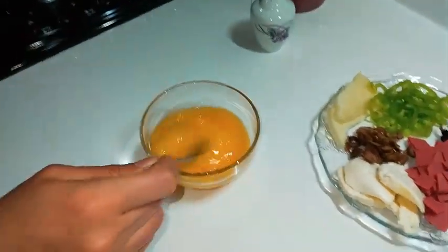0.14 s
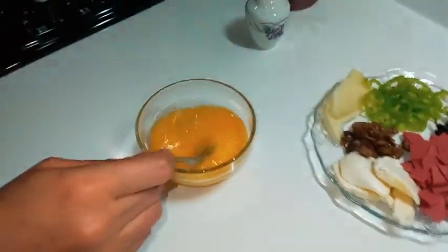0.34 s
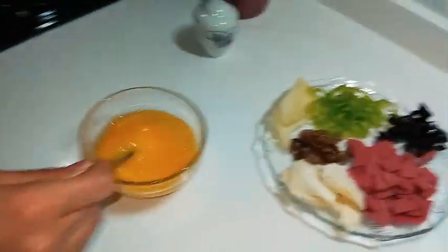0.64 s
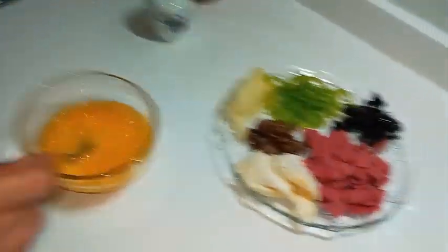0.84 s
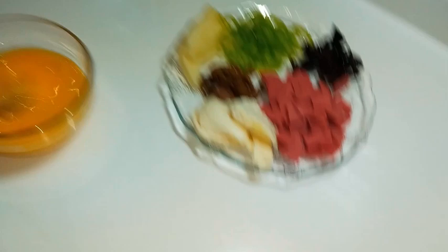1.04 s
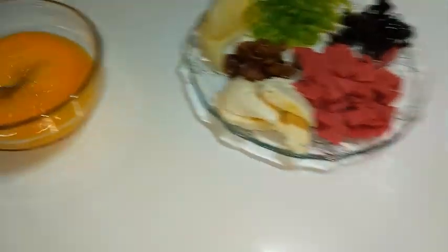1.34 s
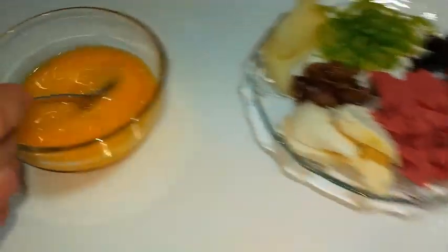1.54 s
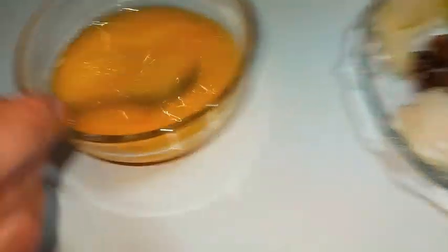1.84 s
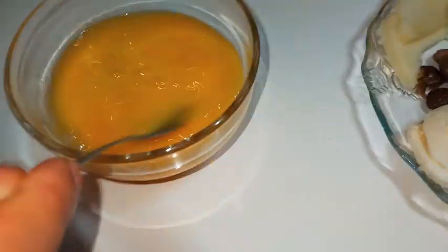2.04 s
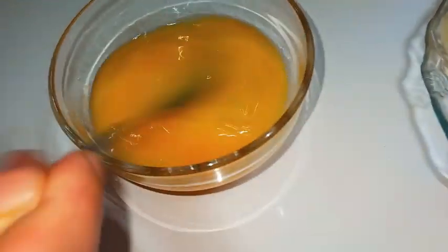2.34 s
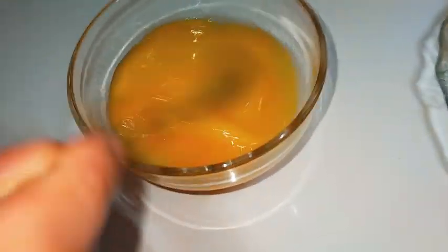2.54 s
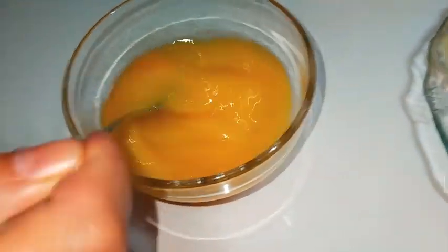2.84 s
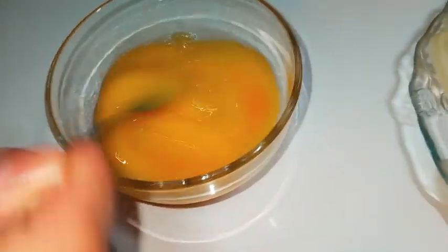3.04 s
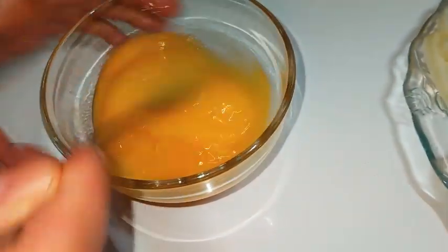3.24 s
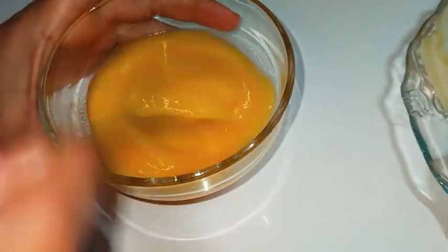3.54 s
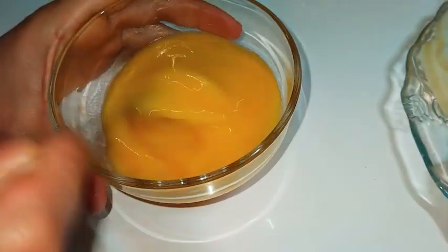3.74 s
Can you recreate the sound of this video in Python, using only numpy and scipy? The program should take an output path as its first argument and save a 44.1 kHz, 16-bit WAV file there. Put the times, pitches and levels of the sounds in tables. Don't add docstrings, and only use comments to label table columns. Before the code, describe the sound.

Spoon clinks on an egg-filled glass bowl, uneven at first, then in quick steady strokes

```python
import sys
import numpy as np
from scipy import signal
from scipy.fft import rfft, irfft, next_fast_len
from scipy.io import wavfile
from scipy.ndimage import map_coordinates

SR = 44100
rng = np.random.default_rng(int(sys.argv[2]) if len(sys.argv) > 2 else 0)


def linear_from_db(decibels):
    return 10 ** (np.asarray(decibels, float) / 20)


def unload_wav(signal):
    wavfile.write(
        sys.argv[1],
        SR,
        np.round(np.clip(np.atleast_2d(signal).T, -1, 1) * 32767).astype(np.int16),
    )


N = 171990

# (pitch [Hz], level [dB], time to fall 60 dB [s])
DAMPED_GLASS = [(2900, -12, .008), (3650, -7, .005), (4500, -12, .005), (5600, -15, .005), (6400, -4, .007),
                (7850, -7, .007), (8600, -6, .008), (9500, -10, .005), (10200, -8, .009), (12000, -4, .007),
                (13800, 7, .0016), (13350, -2, .006), (14600, -2, .005), (15500, 0, .006)]
# (pitch [Hz], level [dB], time to fall 60 dB [s])
COUNTER_NOTES = [(305, 6, 0.043), (498, 0.5, 0.11), (595.5, 8.5, 0.04), (682.5, 10, 0.036),
                 (948, -2.5, 0.082), (1033, 15.5, 0.02), (1326, 1.5, 0.018), (1451, 12, 0.019),
                 (1659, -5, 0.073), (1806, 24.5, 0.0062), (2328, 2, 0.04)]
DETUNE = .015


def unit(x):
    return x / np.sqrt(np.mean(x ** 2) + 1e-20)


def along(points, hz):
    f, v = np.transpose(points)
    return np.interp(np.log(hz + 1), np.log(f + 1), v)


def wobble(rate):
    knots = rng.standard_normal(int(N / SR * 40) + 9)
    return map_coordinates(knots, [np.arange(N) * min(rate, 39) / SR])


def shaped_noise(points):
    m = next_fast_len(N + 8192)
    spectrum = rfft(rng.standard_normal(N), m)
    return unit(irfft(spectrum * linear_from_db(along(points, np.fft.rfftfreq(m, 1 / SR))), m)[:N])


def ring(modes, attack_s, detune, size):
    scatter_db = 2.5
    hz, db, t60 = np.transpose(modes)[:, :, None]
    t = np.arange(size) / SR
    level_luck, pitch_luck = rng.standard_normal((2, len(modes), 1))
    start_db = db + scatter_db * level_luck
    waves = linear_from_db(start_db - 60 * t / t60) * np.sin(2 * np.pi * hz * (1 + detune * pitch_luck) * t)
    return waves.sum(0) * (1 - np.exp(-t / attack_s)) / np.linalg.norm(linear_from_db(start_db))


def struck(modes, chatter_s, attack_s):
    chatter_db = -24
    t = np.arange(SR // 16) / SR
    force = linear_from_db(chatter_db - 60 * t / chatter_s) * rng.standard_normal(len(t))
    force[0] = 1
    x = signal.fftconvolve(ring(modes, attack_s, DETUNE, size=SR // 8), force)
    return x / np.abs(x).max()


def kitchen(x):
    # (pitch [Hz], time to fall 60 dB [s])
    echo_decay = [(250, .45), (1000, .45), (4000, .3), (9000, .25), (16000, .22)]
    room_db, delay_s, tilt_db = -12.5, 0.0043, -2.5
    hz, t, z = signal.stft(rng.standard_normal(SR // 3), SR, nperseg=256)
    hz = hz[:, None]
    fade_db = -60 * t / along(echo_decay, hz) + tilt_db * np.log2(1 + hz / 1000)
    tail = signal.istft(z * linear_from_db(fade_db), SR, nperseg=256)[1]
    tail = np.pad(tail, (round(delay_s * SR), 0))
    wet = linear_from_db(room_db) * signal.fftconvolve(x, tail / np.linalg.norm(tail[:SR // 10]))
    return wet + np.pad(x, (0, len(wet) - len(x)))


def add(track, s, sound, room=1):
    part = track[round((s + 1) * SR):]
    wet = room * kitchen(sound)
    wet[:len(sound)] += (1 - room) * sound
    part[:len(wet)] += wet[:len(part)]


def air():
    # (pitch [Hz], level per Hz [dB])
    rumble_curve = [(15, -21.5), (30, -13.5), (100, 5.5), (180, -11), (320, -8.5), (800, -14), (2500, -21),
                    (4000, -58.5)]
    # (pitch [Hz], level per Hz [dB])
    hiss_curve = [(1500, -20), (2800, 3), (4500, -1), (6300, 0), (7200, -6), (8500, -1), (11000, -3),
                  (14000, 0)]
    # (pitch [Hz], level [dB])
    hum_notes = [(49, -62.5), (98, -64.5), (288, -77.5), (1310, -75), (552, -72)]
    t = np.arange(N) / SR
    sound = shaped_noise(rumble_curve) * linear_from_db(-60 + .8 * wobble(3.4))
    sound += shaped_noise(hiss_curve) * linear_from_db(-70.5)
    for hz, db in hum_notes:
        sound += linear_from_db(db + 2.5 * wobble(5)) * np.sin(2 * np.pi * hz * t + .6 * wobble(4))
    return sound


def handling():
    # (time [s], level [dB], pitch [Hz])
    pushes = [
        (0.444, -39, 30.7),
        (3.033, -40.5, 59.4),
    ]
    push_s = 0.012
    t = np.arange(N) / SR
    sound = np.zeros(N)
    for s, db, hz in pushes:
        sound += linear_from_db(db) * np.exp(-((t - s) / push_s) ** 2) * np.sin(2 * np.pi * hz * (t - s))
    return sound


def egg():
    # (time [s], bubble level [dB])
    stirring = [(0, -78), (.7, -81), (1, -70.5), (1.8, -84), (2.1, -64), (3.5, -57.5), (3.62, -49),
                (3.9, -49)]
    bubbles_per_s, middle_hz, ring_cycles, spread_db = 70, 2400, 6, 3
    count, t = bubbles_per_s * N // SR, np.arange(SR // 50) / SR
    s = rng.random(count) * N / SR
    hz = middle_hz * np.exp(.45 * rng.standard_normal((count, 1)))
    db = np.interp(s, *np.transpose(stirring)) + spread_db * rng.exponential(size=count)
    cycles = hz * t
    shape = linear_from_db(-60 * cycles / (3 * ring_cycles)) * (1 - np.exp(-cycles))
    rising = np.sin(2 * np.pi * cycles * (1 + cycles / 100))
    bubbles = linear_from_db(db)[:, None] * shape * rising
    where = (s * SR).astype(int)[:, None] + np.arange(len(t))
    return kitchen(np.bincount(where.ravel(), bubbles.ravel(), minlength=N))[:N]


def scraping():
    # (time [s], length [s], level [dB])
    drags = [(0.66, 0.056, -48), (1.145, 0.043, -57.5), (1.203, 0.027, -60), (1.432, 0.063, -60),
             (1.984, 0.033, -61), (2.534, 0.03, -41.5), (3.437, 0.027, -44.5), (3.81, 0.031, -51)]
    t = np.arange(N) / SR
    stroke = np.zeros(N)
    for s, length, db in drags:
        stroke += linear_from_db(db) * np.sin(np.pi * np.clip((t - s) / length, 0, 1)) ** 2
    grit = rng.standard_normal(N) * linear_from_db(3 * wobble(35))
    glass = ring(DAMPED_GLASS, 5e-5, DETUNE, size=SR // 20)
    return stroke * unit(signal.fftconvolve(grit, glass)[:N])


def sloshing():
    # (time [s], length [s], level [dB], boost of the low notes [dB])
    sloshes = [
        (3.588, 0.067, -35.5, 7),
        (3.602, 0.026, -29, -13),
        (3.665, 0.055, -59, 11),
        (3.721, 0.0173, -37, 13),
        (3.782, 0.045, -51, 13),
    ]
    # (pitch [Hz], level [dB], time to fall 60 dB [s])
    low_notes = [(497, -3.5, 0.034), (617.6, 1.5, 0.032), (753, -1.5, 0.061), (890, -3.5, 0.06)]
    high_notes = [(1173, 3, 0.046), (1300, 6.5, 0.036), (1650, -3, 0.036), (2070, -8, 0.026)]
    track, t = np.zeros(N + SR), np.arange(SR // 4) / SR
    for s, length, db, low_db in sloshes:
        grit = rng.standard_normal(len(t)) * np.sin(np.pi * np.clip(t / length, 0, 1)) ** .5
        modes = [(hz, note_db + low_db, t60) for hz, note_db, t60 in low_notes] + high_notes
        x = signal.fftconvolve(grit, ring(modes, 0.00051, 0, size=SR // 10))
        add(track, s, linear_from_db(db) * x / np.sqrt(np.sum(x ** 2) / (length * SR)))
    return track[SR:]


def rocking():
    # (time [s], peak level [dB], pitch [Hz])
    knocks = [(0.111, -39.5, 1007), (1.559, -73.5, 1460), (2.051, -64, 931), (2.081, -41.5, 1680),
              (2.309, -26, 1583), (2.615, -41.5, 1557), (2.776, -56.5, 1950), (2.798, -41, 1540),
              (2.975, -52, 1475), (3.337, -39.5, 1604), (3.517, -49, 1710), (3.613, -26.5, 1213),
              (3.627, -21.5, 1300), (3.721, -45, 1440), (3.785, -28.5, 1250), (3.882, -33, 1420)]
    t60, knock_db, counter_db = .022, 6, -12
    neighbours = [(1, 0), (1.3, -6), (.66, -4), (1.7, -14), (2.3, -26)]  # (pitch ratio, level [dB])
    track = np.zeros(N + SR)
    for s, db, hz in knocks:
        modes = [(hz * ratio, note_db, t60) for ratio, note_db in neighbours]
        hollow = struck(modes, 0.034, 0.00089)
        counter = ring(COUNTER_NOTES, 0.0029, 0.029, size=len(hollow))
        add(track, s, linear_from_db(db + knock_db) * (hollow + linear_from_db(counter_db) * counter))
    return track[SR:]


def rattling():
    # (pitch [Hz], level [dB])
    rattle_colour = [(150, -35), (750, -2), (1600, 0), (3600, -3), (4700, -14), (6000, -8), (7200, -18),
                     (16000, -17)]
    # (time [s], level [dB])
    rattles = [
        (.305, -19),
        (2.186, -72),
        (2.30, -31.5),
    ]
    hold_s, t60, tail_db, tail_t60 = 0.0029, 0.063, -17, .22
    track, t = np.zeros(N + SR), np.arange(2 * (SR // 6)) / SR
    for s, db in rattles:
        colour = linear_from_db(along(rattle_colour, np.fft.rfftfreq(len(t), 1 / SR)))
        noise = unit(irfft(rfft(rng.standard_normal(len(t))) * colour))
        shape = linear_from_db(-60 * np.maximum(t - hold_s, 0) / t60) + linear_from_db(tail_db - 60 * t / tail_t60)
        add(track, s, linear_from_db(db) * shape * noise * (1 - np.exp(-t / 0.00053)))
    return track[SR:]


def sway(t):
    knot_s = .01
    return .8 * map_coordinates(rng.standard_normal(round(1 / knot_s)), [t / knot_s])


def rim():
    # (pitch [Hz], level [dB], time to fall 60 dB [s])
    rim_notes = [
        [(702, 0, .2), (738, -3, .15), (892, -10, .22), (1012, -15, .12), (1540, -11, .12), (1710, -5, .17)],
        [(3406, 0, .17), (3260, -11, .1), (3700, -11, .1)],
        [(5776, -2, .16), (8690, -4, .16), (8820, -4, .1)],
        [(12035, 0, .18), (12086, -2, .12)],
    ]
    # (time [s], low notes [dB], middle notes [dB], high notes [dB], top notes [dB])
    clinks = [(.305, -27, -28.5, -29, -26), (.335, -31, -27, -34.5, -48), (.363, -28.5, -32.5, -41, -58),
              (.49, -71, -45, -74, -52), (2.186, -43, -41, -34, -55), (2.30, -36, -48.5, -34, -42),
              (2.35, -48.5, -43.5, -36.5, -60.5), (3.085, -81, -54.5, -75, -63), (3.27, -82, -50, -73, -62)]
    track, t = np.zeros(N + SR), np.arange(2 * (SR // 6)) / SR
    for s, *groups_db in clinks:
        sound = np.zeros(len(t))
        for group_db, group in zip(groups_db, rim_notes):
            for hz, db, t60 in group:
                wave = np.sin(2 * np.pi * (hz * t + rng.random()) + sway(t))
                sound += linear_from_db(group_db + db - 60 * t / t60) * wave * (1 + sway(t) / 2)
        add(track, s, sound * (1 - np.exp(-t / 0.0002)), room=.6)
    return track[SR:]


def spots():
    # (time [s], pitch [Hz], level [dB], time to fall 60 dB [s])
    spot_notes = [(0.177, 2180, -42, 0.035), (0.114, 1083, -34, .25), (.305, 3408, -10.5, 0.038),
                  (0.307, 1536, -20, 0.16), (0.307, 4300, -25.5, 0.031), (.111, 3520, -31, .04),
                  (.364, 3830, -25, 0.028), (0.365, 2700, -28.5, 0.028), (.491, 2230, -36.5, 0.046),
                  (.653, 3410, -43.5, 0.078), (1.336, 1624, -23, 0.028), (1.336, 2210, -30.5, 0.03),
                  (1.795, 2104, -34, 0.037), (1.956, 2300, -33, 0.061), (2.143, 3850, -35, 0.033),
                  (2.186, 809, -39, .2), (2.186, 1426, -26, 0.045), (2.186, 3670, -35, 0.031),
                  (3.587, 8620, -24, .03), (2.301, 6030, -11.5, 0.024), (2.302, 5900, -30, 0.068),
                  (2.3, 3880, -22, 0.04), (2.3, 4700, -17.5, 0.017), (2.304, 3250, -34.5, 0.16),
                  (2.3, 8850, -17.5, 0.039), (2.305, 253, -34, 0.11), (2.311, 149, -47, 0.3),
                  (2.501, 3700, -35.5, 0.071), (2.69, 3750, -39.5, 0.065), (2.854, 2360, -31, 0.031),
                  (2.854, 3630, -33.5, 0.031), (3.036, 4650, -30.5, 0.021), (3.037, 3790, -36.5, 0.034),
                  (3.082, 4140, -34.5, 0.029), (3.102, 2470, -48, 0.066), (3.215, 3240, -42.5, 0.083),
                  (3.4, 3480, -30, 0.028), (3.452, 2150, -44, 0.064), (3.587, 2820, -32, 0.04),
                  (3.765, 1690, -28.5, 0.031), (3.172, 1810, -49, 0.033), (.305, 9620, -22, .035),
                  (2.974, 1980, -49, 0.038)]
    rise_s = 0.00068
    track, t = np.zeros(N + SR), np.arange(SR // 5) / SR
    for s, hz, db, t60 in spot_notes:
        note = linear_from_db(db - 60 * t / t60) * np.sin(2 * np.pi * hz * t)
        add(track, s, note * (1 - np.exp(-t / rise_s)), room=.4)
    return track[SR:]


def click(click_db, thud_db, bright_db):
    glass = [(hz, db + bright_db * np.log2(hz / 8000), t60) for hz, db, t60 in DAMPED_GLASS]
    tick = linear_from_db(click_db + 3) * struck(glass, .022, 5e-5)
    thud = linear_from_db(thud_db + 6) * struck(COUNTER_NOTES, 0.046, 0.0026)
    return tick + thud


def spoon():
    # (time [s], level [dB])
    earlier_stroke = (-0.23, -7.5)
    # (time [s], click [dB], thud into the counter [dB], brightness [dB per octave])
    strokes = [(0.1111, -8.5, -32.5, 5.5), (0.3045, -2, -36, 13), (0.4914, -16.5, -40, 6.5),
               (0.6533, -14.5, -33.5, 1), (1.0898, -18, -41, 1), (1.3356, -12.5, -33, 0.5),
               (1.7951, -14, -35, 3), (1.9562, -13, -37, 0.5), (2.1428, -14, -35.5, 0),
               (2.1852, -23, -42, -5), (2.2996, -12, -32, -2), (2.5008, -11, -34, 0),
               (2.6889, -12, -38.5, 0), (2.8542, -10.5, -34.5, 3.5), (3.037, -11.5, -36.5, 1),
               (3.2136, -9.5, -33, 2), (3.4003, -8.5, -31, 2), (3.5881, -8, -27.5, 2),
               (3.7625, -10, -31, 0.5)]
    # (time [s], click [dB], thud [dB])
    bounces = [(0.3347, -33, -33), (0.364, -16.5, -34), (0.6063, -54.5, -77.5), (0.919, -38.5, -67),
               (2.0107, -27, -47.5), (2.349, -25, -37.5), (2.381, -32, -50), (2.547, -34, -48.5),
               (2.718, -27, -44.5), (2.902, -22, -45), (3.082, -23, -41.5), (3.271, -21, -40.5),
               (3.354, -45, -59), (3.3905, -44, -82), (3.444, -40, -55), (3.534, -40, -48.5),
               (3.565, -45, -62), (3.818, -38, -54)]
    track = np.zeros(N + SR)
    s, db = earlier_stroke
    add(track, s, click(db, db, 0))
    for s, click_db, thud_db, bright_db in strokes:
        add(track, s, click(click_db, thud_db, bright_db))
    for s, click_db, thud_db in bounces:
        add(track, s, click(click_db, thud_db, 0))
    return track[SR:]


def scene():
    background = air() + handling()
    bowl = egg() + scraping() + sloshing() + rocking() + rattling()
    blows = rim() + spots() + spoon()
    return (background + bowl + blows)[None]


def top_cut(x):
    return signal.sosfilt(signal.butter(12, 17130, fs=SR, output="sos"), x)


def record(dry):
    top_hz = 16150
    edge = signal.ellip(6, .5, 34, top_hz - 350, fs=SR, output="sos")
    stop = signal.cheby2(8, 50, top_hz + 950, fs=SR, output="sos")
    mix = signal.sosfilt(stop, signal.sosfilt(edge, dry))
    return top_cut(mix)


dry = scene()
out = record(dry)
unload_wav(out)
```